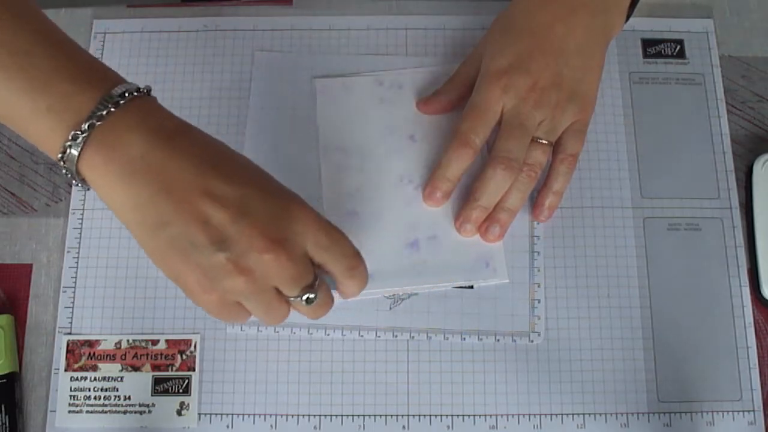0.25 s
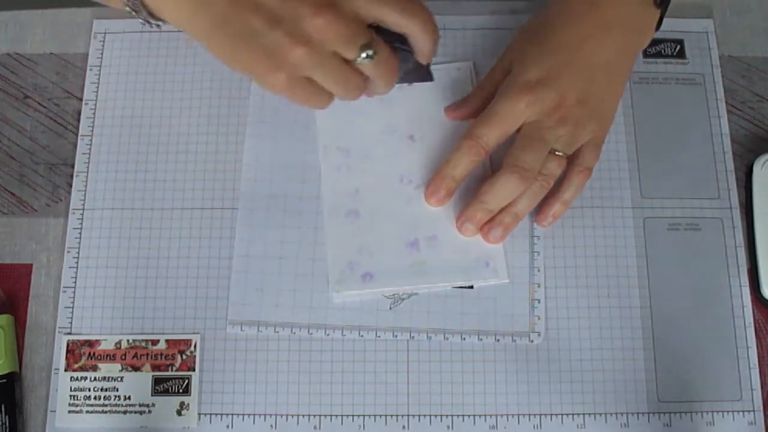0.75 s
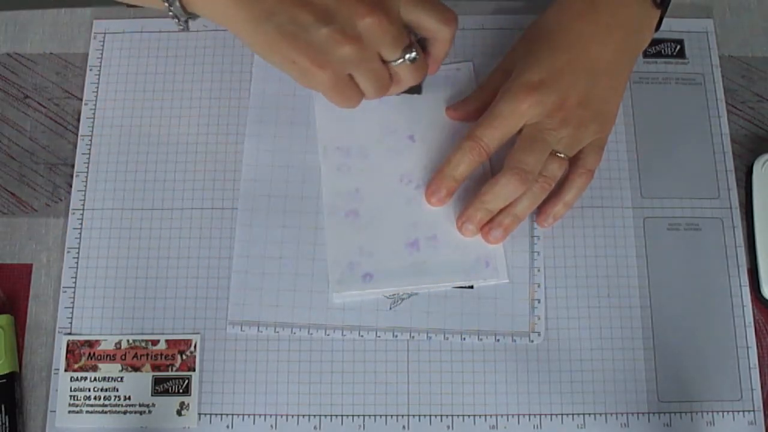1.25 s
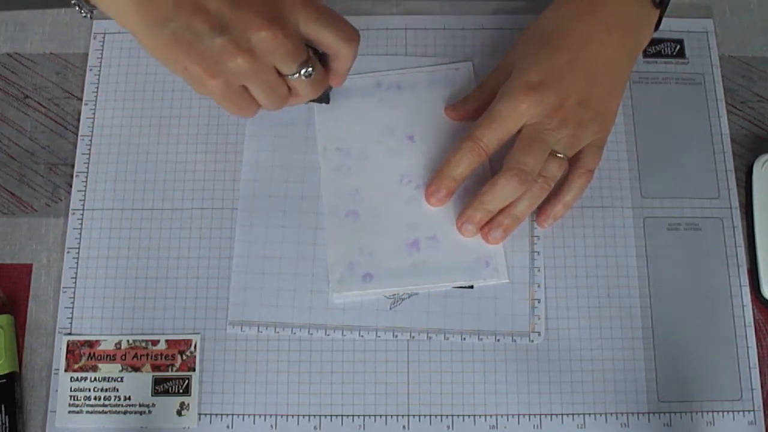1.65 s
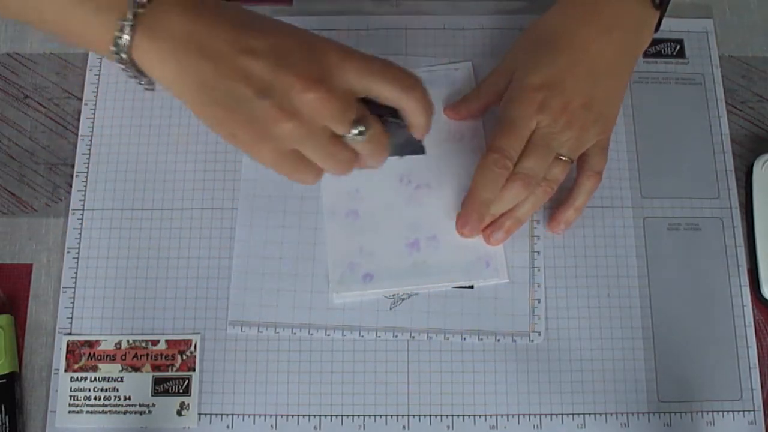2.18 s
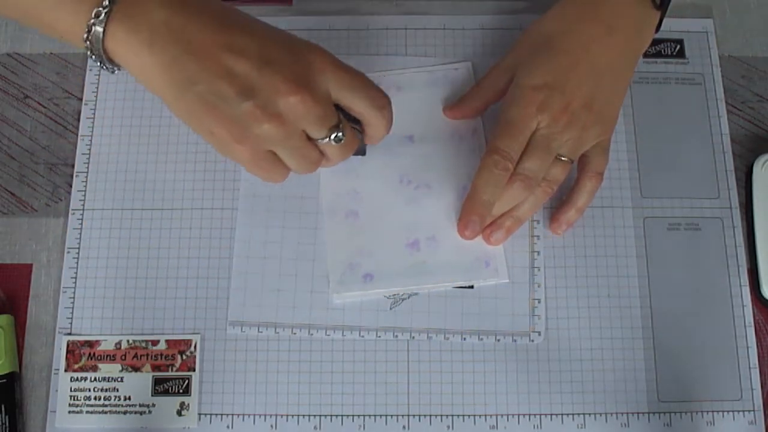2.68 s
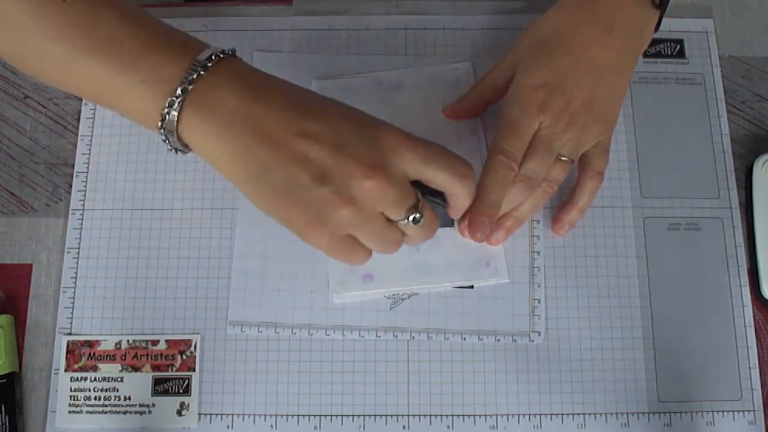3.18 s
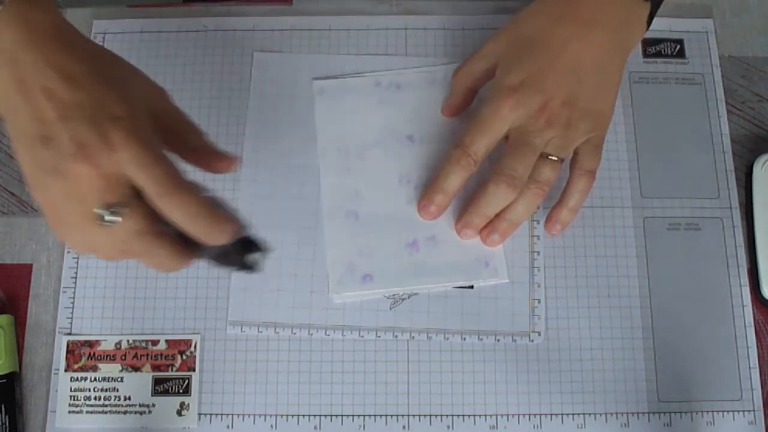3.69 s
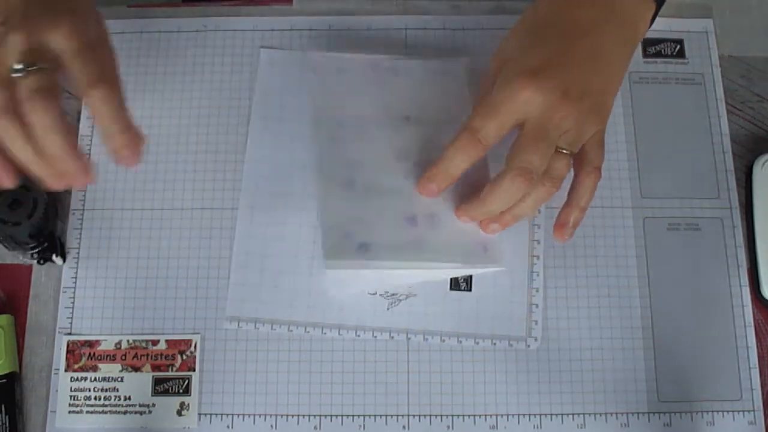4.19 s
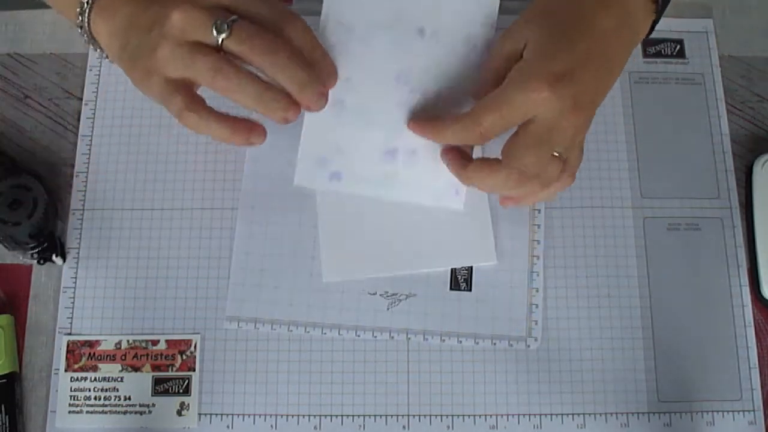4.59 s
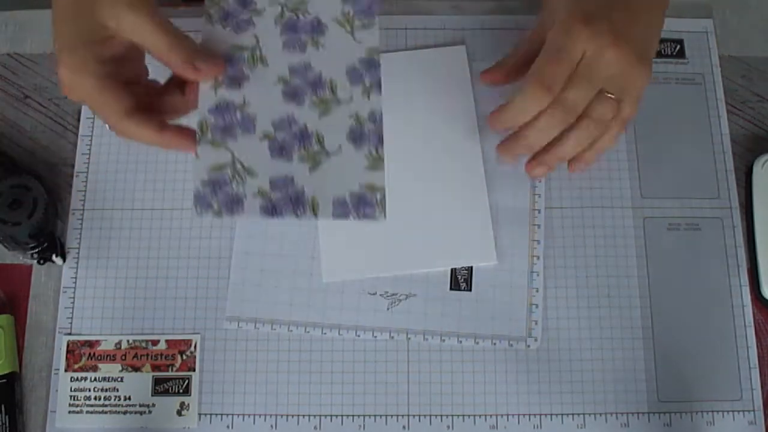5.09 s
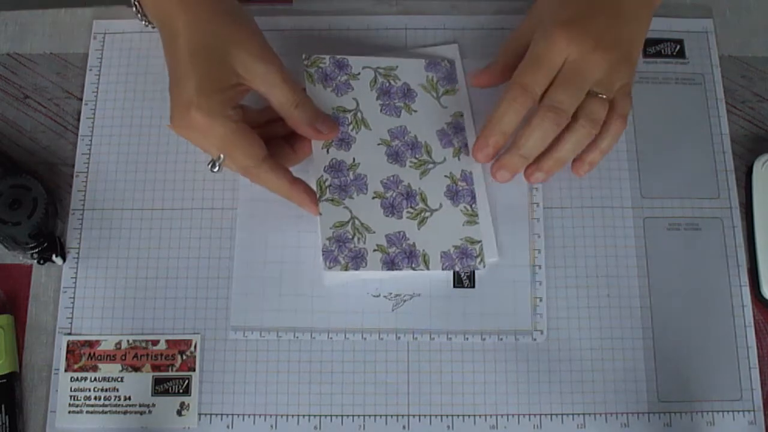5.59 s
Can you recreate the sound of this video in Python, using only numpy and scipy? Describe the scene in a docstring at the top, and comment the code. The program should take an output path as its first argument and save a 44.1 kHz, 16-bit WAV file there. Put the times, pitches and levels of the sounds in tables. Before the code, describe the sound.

A plastic tape dispenser ratchets across card four times at a craft table, each quick buzz changing speed with the hand. It clicks as it is pressed on and lifted, and twice bumps the tabletop. After the fourth stroke it lands with a tiny squeak and a resonant knock, then slides briefly. Soft card rustles follow. Everything sounds near the microphone, with slight small-room reverberation over a low hiss.

```python
"""Over a faint hiss in a small room, a tape runner is drawn along the four edges of a card. In each
stroke its ratchet buzzes at a rate set by the speed of the hand; single clicks sound as it is pressed
on and lifted off, and it bumps the craft table before the third and fourth strokes. Near 4 s it is put
down with a stick-slip squeak and a knock that rings the modes of the table, then pushed aside with a
rub of friction. Last, sheets of card rustle quietly as they are handled."""
import sys
import numpy as np
from scipy import signal
from scipy.fft import rfft, irfft
from scipy.io import wavfile
from scipy.ndimage import uniform_filter1d

SR = 44100
rng = np.random.default_rng(int(sys.argv[2]) if len(sys.argv) > 2 else 0)


def waveform_to_disk(signal):
    """Save audio, clipped to [-1, 1], as 16-bit WAV at the path in sys.argv[1]."""
    frames = np.transpose(np.atleast_2d(signal))
    scaled = np.clip(frames, -1, 1) * 32767
    samples = np.round(scaled).astype(np.int16)
    wavfile.write(sys.argv[1], SR, samples)


N = 257959
TIME = np.arange(N) / SR
CUTOFF_HZ = 10980

# Levels in the tables are relative: each source applies its own gain.
# spectrum of the background hiss: f/Hz, level/dB
HISS_SPECTRUM = [(25, -16), (55, -14), (80, -15.5), (130, -7.5), (220, -4), (330, -1.5), (790, -3),
                 (1300, -6), (2500, -9), (5000, -12.5), (11000, -17.5)]
# reverberation time of the room: f/Hz, T60/s
ROOM_T60 = [(150, 0.39), (700, 0.42), (2000, 0.34), (5500, 0.3), (11000, 0.27)]
# spectrum of rubbed card fibres: f/Hz, level/dB
CARD_SPECTRUM = [(150, -16), (400, 10.5), (750, 10.5), (1500, 8), (3000, -0.5), (6500, 2.5), (11000, -1)]
# rustles of card and hands, with a thin squeak of bracelet or arm (0.56 s) and a squeal of tape
# starting to peel (1.2 s): t/s, level/dB, length/s, f/Hz, bandwidth/Hz
RUSTLES_AND_SQUEAKS = [(0.396, -49, .18, 4670, 1390), (.56, -48, .035, 4900, 200),
                       (1.013, -38, 0.024, 2780, 2920), (1.144, -40.5, .024, 2010, 1980),
                       (1.2, -28.5, 0.033, 2640, 180), (4.483, -50.5, 0.021, 1280, 2500),
                       (4.78, -45, .009, 1800, 4940), (4.816, -42, 0.02, 1090, 1400),
                       (4.86, -46.5, 0.013, 1500, 5070), (5.036, -54.5, .056, 3480, 9200),
                       (5.216, -42, 0.0028, 5800, 1000), (5.441, -42.5, 0.0092, 3000, 8000),
                       (5.445, -58.5, .18, 7060, 4000)]
# resonances of the sliding case: f/Hz, bandwidth/Hz, level/dB
SLIDE_MODES = [(1890, 190, 20), (2780, 390, 8), (3930, 110, 11), (4900, 62, 19.5), (7000, 180, -13),
               (10100, 100, -21)]
# harmonics of the skid squeak: harmonic number, level/dB
SQUEAK_HARMONICS = [(1, 2), (2, 4.5), (3, -1), (4, -1)]
# normal modes of the table top: f/Hz, level/dB, T60/s
TABLE_MODES = [(126.7, -27, 0.52), (209.4, -20.5, 0.2), (313, -8.5, 0.048), (377, -7, 0.079),
               (425, -10, 0.057), (467, -15, 0.12), (515, -16, 0.065), (624, -8.5, 0.045)]
# blows of the runner on the table: t/s, level/dB, contact time/s
KNOCKS = [(2.361, -17, 0.0026), (3.133, -19.5, 0.0041), (3.968, -11.5, 0.0012), (4.041, -19, .0008),
          (4.254, -36.5, 0.00022)]
# spectrum of contacts on the plastic case: f/Hz, level/dB
CASE_SPECTRUM = [(100, -35), (300, -19), (950, -9.5), (1350, -2), (1850, 1.5), (2800, -1), (3500, -4),
                 (4500, -2), (6000, -6), (8000, -8), (11000, -13.5)]
# single clicks of the mechanism: t/s, level/dB, ring f/Hz
CLICKS = [(.322, -18.5, 1530), (.336, -27.5, 1700), (.346, -20.5, 1620), (.597, -39, 2900),
          (.661, -37, 3020), (.806, -36.5, 2550), (1.005, -34.5, 2920), (1.034, -29, 2780),
          (1.126, -30.5, 1800), (1.66, -19.5, 1820), (1.688, -20, 1800), (1.784, -21.5, 1860),
          (1.931, -28, 6000), (1.938, -19.5, 1860), (2.292, -35, 2800), (2.713, -18, 4500),
          (2.834, -34, 2060), (3.154, -28.5, 1550), (3.719, -40.5, 1890), (3.778, -35, 3040),
          (4.051, -23.5, 3050), (4.101, -26, 3900)]
# spectrum of the ratchet: f/Hz, level/dB
RATCHET_SPECTRUM = [(60, -45), (120, -21.5), (170, -24.5), (350, -20.5), (600, -17.5), (950, -12),
                    (1300, -5), (1700, 1), (2200, -6), (2800, -1.5), (3400, -8), (4600, -3.5), (6300, -5),
                    (8000, -10), (11000, -14.5)]
# resonances of case and hollow hand, three for each stroke: f/Hz, bandwidth/Hz, level/dB
GRIP_MODES = [
    [(1300, 84, -0.5), (1480, 200, 4.5), (3890, 110, 5.5)],
    [(1310, 160, -6), (2380, 290, -4.5), (4780, 230, -3.5)],
    [(770, 82, -2.5), (1800, 220, -9), (2730, 180, -15)],
    [(1530, 97, -7), (2067, 150, 2.5), (6500, 340, -10)],
]
# strokes: start t/s, end t/s, first tooth rate/Hz, full tooth rate/Hz, slowing time/s, level/dB
STROKES = [(.003, .25, 87.4, 87.4, .2, -21.3), (1.187, 1.612, 42, 95, .204, -22.2),
           (2.428, 2.64, 53.5, 124.5, .041, -21.6), (3.267, 3.532, 28, 123, .128, -22)]


def from_db(db):
    """The decibel is logarithmic: 20 dB is a factor of ten in amplitude."""
    return 10 ** (np.asarray(db) / 20)


def at_hz(points, hz):
    """Interpolation of a table along a logarithmic frequency axis."""
    f, value = np.transpose(points)
    return np.interp(np.log(np.maximum(hz, 1)), np.log(f), value)


def add(track, start, shape):
    """Superposition: a shape is summed into the track from its start time in seconds."""
    part = track[max(round(start * SR), 0):][:len(shape)]
    part += shape[:len(part)]


def colour(x, spectrum, size=4096):
    """Minimum-phase filtering to a spectrum; white noise comes out with its power below the cutoff."""
    hz = np.fft.rfftfreq(size, 1 / SR)
    gain = from_db(at_hz(spectrum, hz))
    gain /= np.sqrt(np.mean(gain ** 2 * (hz < CUTOFF_HZ)))
    cepstrum = irfft(np.log(gain))
    cepstrum[1:size // 2] *= 2  # folding onto positive time makes the filter causal
    cepstrum[size // 2 + 1:] = 0
    impulse_response = irfft(np.exp(rfft(cepstrum)))
    return signal.fftconvolve(x, impulse_response)[:N]


def resonate(x, hz, width):
    """A damped resonator with unit gain at its peak and a bandwidth in Hz."""
    r = np.exp(-np.pi * width / SR)
    feedback = [1, -2 * r * np.cos(2 * np.pi * hz / SR), r * r]
    return signal.lfilter(np.array([1, 0, -1]) * (1 - r * r) / 2, feedback, x + 1e-18)


def grit(spread_db):
    """Contact noise: dense tiny impulses of random sign and size, with unit rms."""
    x = rng.choice([-1, 1], N) * from_db(spread_db * np.clip(rng.standard_normal(N), -2, 2))
    return x / np.std(x)


def burst(length, rise, steepness):
    """Transient envelope of one contact: an exponential rise, then a steeper than exponential fall."""
    t = TIME[:int(10 * length * SR)]
    return (1 - np.exp(-t / rise)) * np.exp(-(t / length) ** steepness)


def swell(start, rise, hold, release, fade_db_per_s, depth_db):
    """Piecewise exponential envelope of a rub: it climbs, sags steadily and is let go."""
    sag_db = -fade_db_per_s * hold
    corners = start + np.cumsum([0, rise, hold, release])
    levels_db = [-depth_db, 0, sag_db, sag_db - depth_db]
    return from_db(np.interp(TIME, corners, levels_db, left=-np.inf, right=-np.inf))


def hiss(level_db=-53.5):
    """Stationary Gaussian noise, strongest in the low mid range, forms the background."""
    return from_db(level_db) * colour(rng.standard_normal(N), HISS_SPECTRUM)


def room(x, wet_db, first_echo_s=.006, late_db=-27, late_t60=0.89, size=8192):
    """Reverberation: diffuse echoes decay exponentially, band by band, over a faint slower tail."""
    t, bands, out = TIME[:SR], [], x.copy()
    late_tail = from_db(late_db - 60 * t / late_t60)
    edges_hz = np.geomspace(90, 14000, 9)
    for low, high in zip(edges_hz, edges_hz[1:]):
        bandpass = signal.butter(2, [low, high], "band", fs=SR, output="sos")
        noise = signal.sosfilt(bandpass, rng.standard_normal(N + SR))
        decay = from_db(-60 * t / at_hz(ROOM_T60, np.sqrt(low * high))) + late_tail
        bands.append((noise, decay * (t > first_echo_s)))
    # the echo pattern changes as the hands move: each overlapping piece meets a different one
    for i in range(0, N, size):
        start = max(i - size, 0)
        near = np.arange(start, min(i + size, N))
        piece = x[near] * np.cos(np.pi / 2 * (near - i) / size)
        echoes = sum(noise[i:i + SR] * decay for noise, decay in bands)
        echoes /= np.linalg.norm(echoes)
        add(out, start / SR, from_db(wet_db) * signal.fftconvolve(piece, echoes))
    return out


def rustles_and_squeaks(level_db=3):
    """Friction noise: card and hands rustle in wide bands; bracelet or arm and tape squeak in narrow."""
    out, friction = np.zeros(N), colour(grit(spread_db=21), CARD_SPECTRUM)
    for start, db, length, hz, width in RUSTLES_AND_SQUEAKS:
        envelope = np.zeros(N)
        add(envelope, start, from_db(db) * burst(length, length / 5, steepness=1.9))
        band = resonate(friction, hz, width)
        out += envelope * band / np.std(band)
    return from_db(level_db) * out


def case_slide(level_db=-38.5, rub_db=-8):
    """Forced vibration: friction on the mat drives the resonances of the case as it coasts to rest."""
    friction = grit(spread_db=6.5)
    song = sum(from_db(db) * resonate(friction, hz, width) for hz, width, db in SLIDE_MODES)
    rub = from_db(rub_db) * colour(friction, CASE_SPECTRUM)
    envelope = swell(start=4.102, rise=.023, hold=.12, release=.028, fade_db_per_s=77, depth_db=17)
    return from_db(level_db) * envelope * (song / np.std(song) + rub)


def skid_squeak(start_s=3.955, rise_s=.013, fade_s=.08, level_db=-25, jitter=0.0352):
    """Stick-slip oscillation: the landing case skids on the mat, faster as the weight comes on."""
    slip_hz = np.interp(TIME - start_s, [0, rise_s, rise_s + fade_s], [340.3, 446, 475])
    unevenness = uniform_filter1d(rng.standard_normal(N), size=100)
    slip_hz *= 1 + jitter * unevenness / np.std(unevenness)
    phase = 2 * np.pi * np.cumsum(slip_hz) / SR
    tone = sum(from_db(db) * np.sin(round(k) * phase) for k, db in SQUEAK_HARMONICS)
    envelope = swell(start_s, rise_s, fade_s, release=rise_s, fade_db_per_s=430, depth_db=26)
    return from_db(level_db) * envelope * tone


def ring(force, modes):
    """Modal superposition: a unit impulse rings each mode at its own level; a steady force is silent."""
    out = np.zeros(N)
    for hz, db, t60 in modes:
        width = np.log(1000) / (np.pi * t60)
        out += from_db(db) * resonate(force, hz, width) * SR / (2 * np.pi * width)
    return out


def rocking_touches(count=2, gap_s=.022, first_db=-11, loss_db=3):
    """Damped rocking: after each blow the case touches the table again, ever more lightly."""
    return [(start + (k + 1) * gap_s, db + first_db - k * loss_db, contact)
            for start, db, contact in KNOCKS for k in range(count)]


def table_knocks(thud_hz=400, thud_db=2, thud_t60=0.0048, low_cut_hz=125):
    """Impact excitation: the longer the contact, the more it favours the low modes of the table."""
    force = np.zeros(N)
    for start, db, contact in [*KNOCKS, *rocking_touches()]:
        push = burst(contact, contact, steepness=3.06)
        add(force, start, from_db(db) * push / push.sum())
    board = ring(force, [*TABLE_MODES, (thud_hz, thud_db, thud_t60)])
    # the microphone's low cut thins the deep bass of the knocks
    return signal.sosfilt(signal.butter(4, low_cut_hz, "high", fs=SR, output="sos"), board)


def jolts(gain_db=-5.5, loss_db_per_s=2000, ring_hz=3000):
    """Shock excitation: each blow jolts a click from the case, weaker when the contact is long."""
    return [(start, db + gain_db - loss_db_per_s * contact, ring_hz) for start, db, contact in KNOCKS]


def loose_ticks(held_s=3.95, per_s=3, mean_db=-44, spread_db=4, ring_hz=2300):
    """Rattle: loose parts tick faintly at random times while the runner is held."""
    chance = rng.uniform(-1, 1, (round(per_s * held_s), 3))
    return [(held_s * abs(when), mean_db + spread_db * strength, ring_hz * 2 ** (pitch / 2))
            for when, strength, pitch in chance]


def case_clicks(level_db=1.18, ring_db=-4, ring_width_hz=750, soft_db=-48, hard_db=-15):
    """Free vibration: single teeth and loose parts snap in the case, each with its own short ring."""
    out, contacts = np.zeros(N), grit(spread_db=8)
    for start, db, hz in [*CLICKS, *jolts(), *loose_ticks()]:
        # a gentler contact lasts longer and is duller
        length_s = np.interp(db, [soft_db, hard_db], [.006, .0046])
        top_hz = np.interp(db, [soft_db, hard_db], [4000, 16000])
        shape = burst(length_s, rise=.0013, steepness=1.78)
        snap = from_db(db) * shape * contacts[round(start * SR):][:len(shape)]
        snap = signal.lfilter(*signal.butter(1, top_hz, fs=SR), snap)
        add(out, start, snap + from_db(ring_db) * resonate(snap, hz, ring_width_hz))
    return from_db(level_db) * colour(out, CASE_SPECTRUM)


def tooth_rate(start, end, first_hz, full_hz, slowing_s, rise_hz_per_s=1400, last_hz=46):
    """Tooth rate is proportional to hand speed, which rises, holds and falls towards the corner."""
    speeding_up = first_hz + rise_hz_per_s * (TIME - start)
    slowing_down = np.interp(TIME, [end - slowing_s, end], [full_hz, last_hz])
    return np.minimum(speeding_up, slowing_down) * (TIME >= start) * (TIME < end)


def ratchet(stroke, grip, tooth_s=0.0047, rise_s=0.002, uneven_db=0.5, peel_db=-14, level_db=2.0):
    """An impact train makes a buzz: the pawl chatters over each tooth while the peeling tape crackles."""
    *motion, stroke_db = stroke
    rate_hz = tooth_rate(*motion)
    pace = rate_hz / rate_hz.max()
    teeth_passed = np.ceil(np.cumsum(rate_hz) / SR)
    chatter = grit(spread_db=3)
    peel = from_db(peel_db) * pace * grit(spread_db=8)
    teeth = np.zeros(N)
    for i in np.flatnonzero(np.diff(teeth_passed, prepend=0)):
        softness, duration, pitch = rng.standard_normal(3)
        # slow teeth let go with a sharper snap
        shape = burst(tooth_s * np.exp(.1 * duration), rise_s * np.sqrt(pace[i]), steepness=2.8)
        tooth = from_db(-uneven_db * softness) * shape * chatter[i:i + len(shape)]
        # the gears turn, so each tooth favours another resonance of the plastic
        ping_hz = min(3200 * np.exp(.5 * pitch), CUTOFF_HZ)
        add(teeth, i / SR, tooth + resonate(tooth, ping_hz, width=400))
    buzz = teeth + peel
    hollow = sum(from_db(db) * resonate(buzz, hz, width) for hz, width, db in grip)
    return from_db(level_db + stroke_db) * colour(buzz + hollow, RATCHET_SPECTRUM)


def scene():
    """Linear superposition: runner, card and table with their reverberation, over the hiss."""
    strokes = sum(ratchet(stroke, grip) for stroke, grip in zip(STROKES, GRIP_MODES))
    runner_and_card = room(strokes + case_clicks() + case_slide() + rustles_and_squeaks(), wet_db=-5)
    table = room(table_knocks() + skid_squeak(), wet_db=-9)
    return (runner_and_card + table + hiss())[None]


def record(dry):
    """Band limiting: a steep elliptic low-pass filter removes the top of the treble."""
    return signal.sosfilt(signal.ellip(12, .2, 80, CUTOFF_HZ, fs=SR, output="sos"), dry)


dry = scene()
out = record(dry)
waveform_to_disk(out)
```